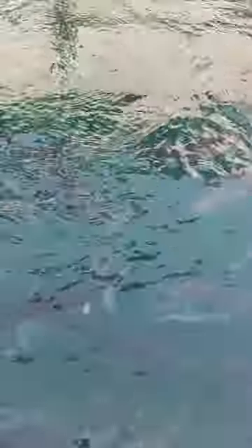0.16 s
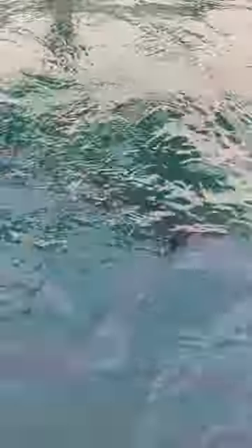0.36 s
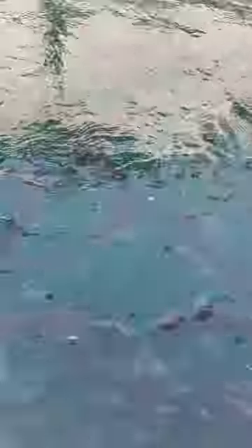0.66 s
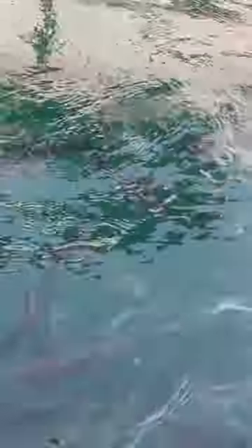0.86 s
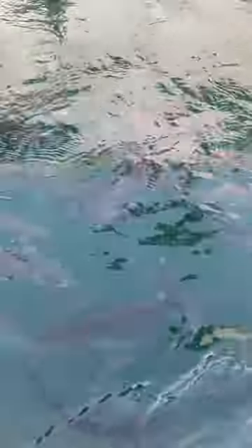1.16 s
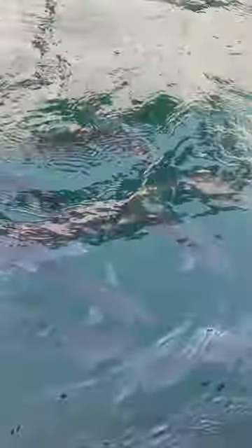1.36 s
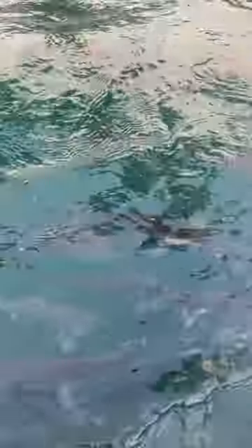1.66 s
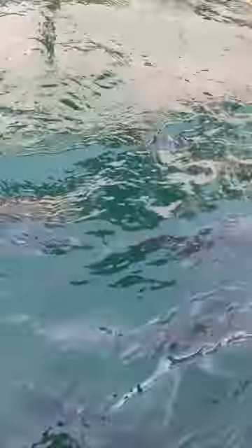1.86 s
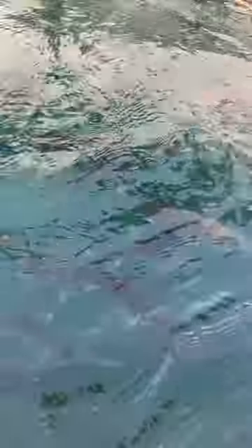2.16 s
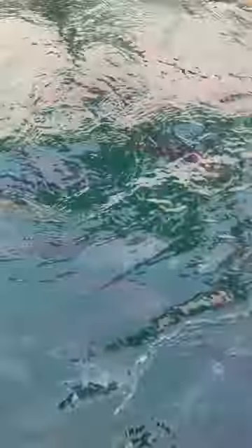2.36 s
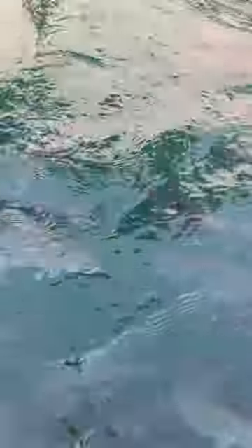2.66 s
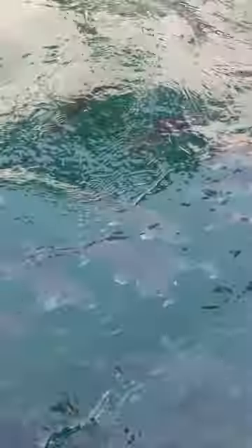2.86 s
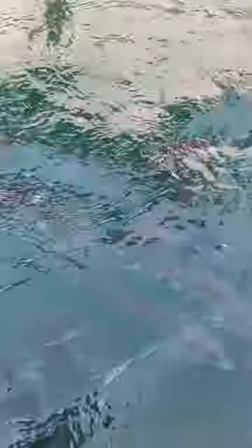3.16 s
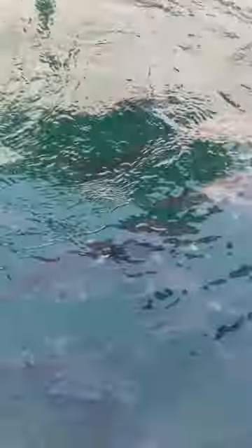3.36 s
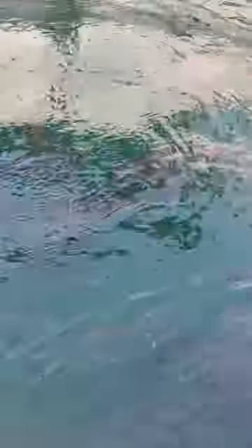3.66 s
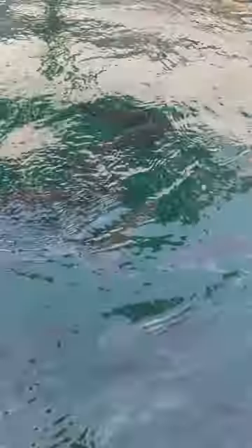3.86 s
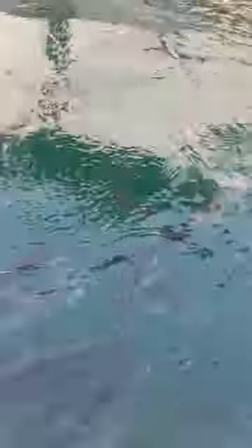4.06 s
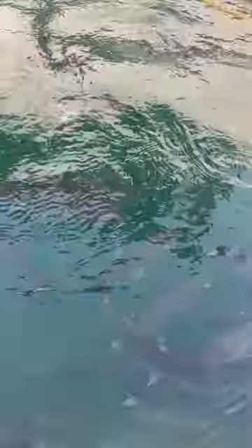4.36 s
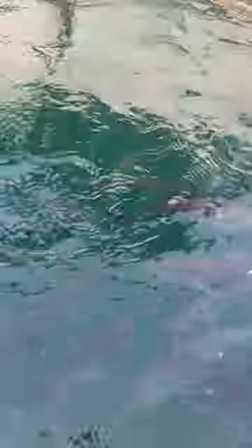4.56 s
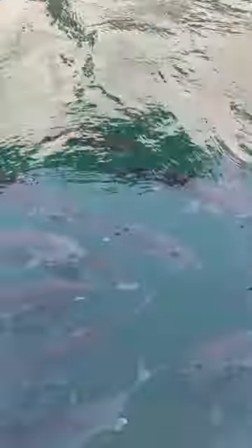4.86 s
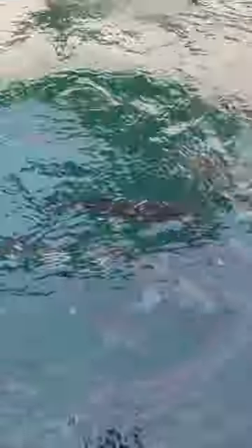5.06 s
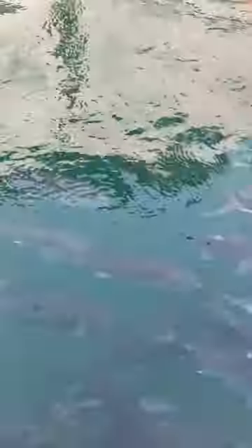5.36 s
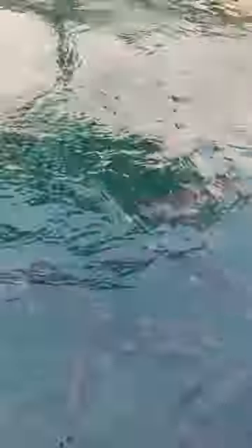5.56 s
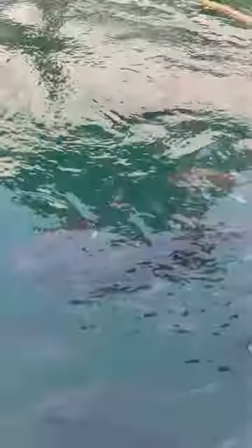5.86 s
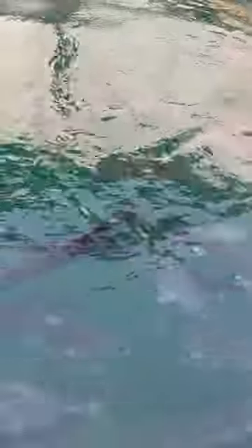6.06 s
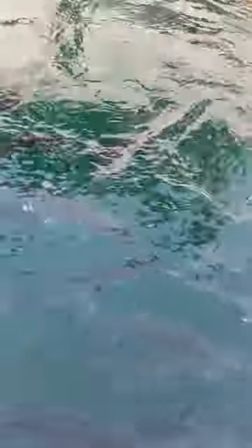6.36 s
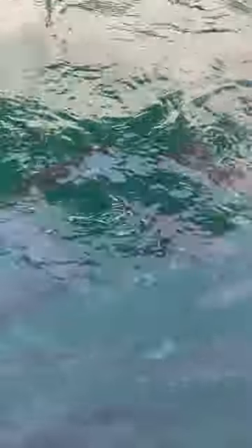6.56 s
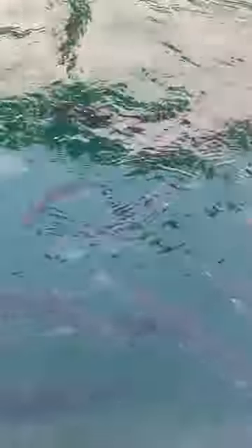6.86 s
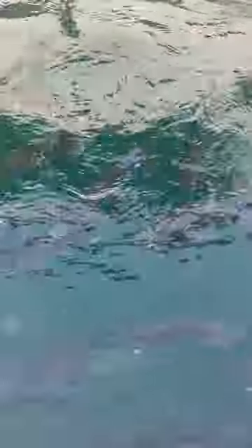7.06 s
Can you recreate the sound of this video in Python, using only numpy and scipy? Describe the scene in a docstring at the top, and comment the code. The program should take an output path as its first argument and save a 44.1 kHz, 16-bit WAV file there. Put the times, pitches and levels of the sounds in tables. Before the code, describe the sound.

Close stereo microphones just above the water at a floating fish pen. From 0 to 0.5 s a quick cluster of dull, low swell thumps rolls under small laps and bubbles; another comes around 0.8-1.2 s. A rising bubbly gulp plinks at 1.5 s, a sharp drip ticks at 2.0 s, and a deep thump with a low bloop lands near 2.2 s. Scattered thumps and plinks continue from 2.6 to 4.3 s, with a small crisp splash at about 3.95 s. Bright plinks and crackles cluster at 4.5 s, then a low bloop and gulps at 4.8 s. The swell quiets after 5 s; light splashes at 5.6 s, hollow bubbling at 6.2-6.7 s, and a crisp splash at 7.1 s. Throughout, faint foam, trickling bubbles, low rumble, soft wash, open air and a distant wavering machine hum with a thin whine, slightly stronger toward the end.

```python
"""Dull thumps of the swell over a low rumble come first, as small waves lap along a floating fish pen.
Thumps, plinking bubbles and upward gulps are gliding sine notes; ticks, splashes and spray are shaped noise.
Each lap stirs up a trickle of small bubbles and a soft foam of noise; crackles are runs of ringing ticks.
A distant machine hums and whines as a wavering sine with resonating noise, over a wash and open air.
Two closely spaced microphones, just above the water, pick it all up."""
import sys
import numpy as np
from scipy import signal
from scipy.fft import rfft, irfft, next_fast_len
from scipy.io import wavfile
from scipy.ndimage import uniform_filter1d

SR = 44100
rng = np.random.default_rng(int(sys.argv[2]) if len(sys.argv) > 2 else 0)


def pcm_store(signal):
    """Save signal as 16-bit PCM."""
    levels = np.round(np.clip(np.atleast_2d(signal), -1, 1) * 32767)
    wavfile.write(sys.argv[1], SR, levels.astype(np.int16).T)


N = 318402
TIME = np.arange(N) / SR
COARSE_TIME = TIME[::40]   # slow curves are worked out at every 40th sample
CUTOFF_HZ = 15900


def from_db(db):
    """Turn decibels into a gain."""
    return 10 ** (np.asarray(db) / 20)


def rms_one(x):
    """Scale a sound to an average (rms) strength of 1."""
    return x / np.sqrt(np.mean(x ** 2) + 1e-20)


def in_time(rows):
    """Read a (seconds, value) curve at every sample."""
    seconds, values = np.transpose(rows)
    return np.interp(TIME, seconds, values)


def at_hz(points, hz):
    """Read a (Hz, value) curve, with pitch counted in octaves."""
    f, value = np.transpose(points)
    return np.interp(np.log(np.maximum(hz, 1)), np.log(f), value)


def band(x, low_hz, high_hz):
    """Keep the sound between two pitches, with gentle edges."""
    sos = signal.butter(2, [low_hz, min(high_hz, .45 * SR)], "band", fs=SR, output="sos")
    return signal.sosfilt(sos, x)


def drift(rate_hz):
    """Slow random motion of spread 1: noise smoothed twice, so little is left above the rate."""
    r = np.exp(-2 * np.pi * rate_hz * 40 / SR)
    noise = rng.standard_normal(N // 40 + 2002)
    slow = signal.lfilter([1], [1, -2 * r, r * r], noise)[2000:]   # skip the settling of the filter
    return np.interp(np.arange(N) / 40, np.arange(len(slow)), rms_one(slow))


def fade_60db(t, t60_s):
    """Natural dying away that loses 60 dB in t60_s seconds."""
    return np.exp(-np.log(1000) * t / t60_s)


def bell(t, half_width_s):
    """A smooth rise and fall around time 0."""
    return np.exp(-.5 * (t / half_width_s) ** 2)


def glide_sine(pitch_hz, turn=0):
    """A sine that follows a moving pitch, starting some part of a turn into its cycle."""
    return np.sin(2 * np.pi * (np.cumsum(pitch_hz) / SR + turn))


def ring(x, hz, t60_s):
    """A resonance: each click in x sets a fading sine ringing."""
    r, w = from_db(-60 / (t60_s * SR)), 2 * np.pi * hz / SR
    return signal.lfilter([0, np.sin(w)], [1, -2 * r * np.cos(w), r * r], x)


def add(out, s, sound):
    """Mix a sound in, starting at time s in seconds."""
    i = int(round(s * SR))
    first, last = max(i, 0), min(i + len(sound), N)
    if last > first:
        out[first:last] += sound[first - i:last - i]


# How alike the left and right surroundings are. Each row: pitch in Hz, likeness from 0 to 1.
LIKENESS = [(180, 1), (300, .95), (500, .5), (800, .1), (1400, .6), (3000, .5), (5000, .85), (16000, .85)]


def surround(spectrum, patchy_db):
    """Stereo noise in half-octave bands, each flickering by itself; strength (rms) 1."""
    out, edges = 0, 20 * 2 ** np.arange(0, 10.1, .5)
    white = rng.standard_normal((2, 2, N))
    for k, (low, high) in enumerate(zip(edges, edges[1:])):
        hz = np.sqrt(low * high)
        if high < spectrum[0][0] or low > spectrum[-1][0]:
            continue
        mid, side = band(white[k % 2], low, high)   # neighbouring bands use separate noise
        alike = at_hz(LIKENESS, hz)
        gain = from_db(at_hz(spectrum, hz) + patchy_db * drift(15.2))
        # the side noise enters the right with its sign flipped
        pair = np.sqrt(1 + alike) * mid + np.sqrt(1 - alike) * side * [[1], [-1]]
        out = out + gain * pair
    return rms_one(out)


# Dull thumps of the swell. Each row: crest in seconds, level in dB, basic pitch in Hz,
# length of the dying away in cycles (stretched by each part's own width).
THUMPS = [(.02, -39, 165, .8), (.059, -30, 99.3, 0.42), (0.162, -32.5, 114.4, 0.6),
          (0.201, -27.5, 99.2, 0.32), (.222, -31, 111.4, 0.25), (.254, -31.5, 83.4, 0.44),
          (0.312, -29, 84.3, 0.37), (0.339, -36, 60.8, 0.3), (0.386, -36, 126.8, 1.0),
          (0.419, -37, 88, 0.79), (0.479, -44, 109, 0.46), (0.525, -39.5, 75, 0.29),
          (.805, -35.5, 78.4, 0.56), (0.869, -31, 63.6, 0.63), (.928, -31, 91.3, .4),
          (.976, -25.5, 66.2, 0.67), (1.046, -36, 74.7, .6), (1.195, -36.5, 108.7, .5),
          (1.218, -32, 89.9, 0.54), (1.631, -39.5, 87.8, 0.56), (2.149, -35.5, 124.8, 0.87),
          (2.18, -27.5, 115.8, 0.51), (2.211, -23, 63.7, 0.42), (2.57, -38, 72, 0.48),
          (2.749, -28, 81, 0.36), (2.837, -29.5, 87.8, 0.17), (3.028, -32.5, 92.5, 0.49),
          (3.117, -26, 112.7, 0.21), (3.129, -29, 63.2, 0.35), (3.352, -28, 72, 0.69),
          (3.694, -33, 77.6, 0.48), (3.809, -37, 57, 0.4), (3.98, -25.5, 115.8, 0.57),
          (4.27, -30, 96.8, 0.51), (4.771, -33, 133.6, 0.89), (4.827, -29.5, 100.2, 0.62),
          (6.162, -43, 66.5, 0.44), (6.218, -40.5, 68.8, 0.3), (6.271, -40, 80, .45),
          (6.429, -42, 58.4, 0.53), (6.572, -37.5, 60.6, 0.7)]
# A thump is a quick slap, the main push and a rebound. Each row: time after the crest in seconds,
# added level in dB, pitch as a ratio, half width in cycles (scaled by the rise or the dying away).
THUMP_PARTS = [(-.006, -7, 1.58, 0.76), (0, 0.5, 0.96, 1), (0.028, -19, 1.1, 0.34)]


def thumps(fall_octaves_per_s=24, rise=0.37):
    """Each part of a thump swells within a cycle or so and sinks in pitch as it dies."""
    out, t = np.zeros(N), np.arange(-2200, 4000) / SR
    for s, db, hz, tail in THUMPS:
        for after_s, part_db, ratio, cycles in THUMP_PARTS:
            pitch = hz * ratio * 2 ** np.clip(-fall_octaves_per_s * t, -.5, 1)
            width_cycles = cycles * np.where(t < 0, rise, tail)
            swell = 1 / np.cosh(t * hz * ratio / width_cycles)
            add(out, s + after_s + t[0], from_db(db + part_db) * swell * glide_sine(pitch, rng.random()))
    return out


# Colour of the rumble. Each row: pitch in Hz, relative strength in dB per Hz.
RUMBLE = [(20, -16.5), (33, -21.5), (52, 10.5), (90, 0), (140, -3), (200, -13.5), (280, -37), (400, -32.5)]
# Rumble between thumps. Each row: time in seconds, level in dB before gain_db is added.
RUMBLE_LEVEL = [(0.0, -41.5), (0.14, -53.5), (0.64, -57), (1.03, -54), (1.33, -60), (1.63, -56),
                (1.97, -59), (2.21, -55), (2.57, -57.5), (2.71, -57.5), (2.91, -53), (4.1, -57.5),
                (4.6, -60.5), (5.43, -60.5), (6.07, -58), (6.31, -54.5), (6.92, -56.5), (7.22, -58)]


def rumble(gain_db=5, churn_db=-13, attack_s=0.035, release_s=0.028):
    """Low noise that builds up to each thump and settles after it."""
    churn_power = 0
    for s, db, *_ in THUMPS:
        speed_s = np.where(COARSE_TIME < s, attack_s, release_s)
        build_up = np.exp(-np.abs(COARSE_TIME - s) / speed_s)
        churn_power = churn_power + (from_db(db + churn_db) * build_up) ** 2
    between = from_db(in_time(RUMBLE_LEVEL) + gain_db)
    level = np.sqrt(between ** 2 + np.interp(TIME, COARSE_TIME, churn_power))
    return level * surround(RUMBLE, patchy_db=3.0)


# Strength of the machine's hum. Each row: time in seconds, average (rms) level in dB before its waver.
HUM = [(0, -57), (.8, -66.5), (1.8, -60.5), (2.3, -61.5), (3.6, -62.5), (4.5, -60.5), (5.4, -57.5),
       (6.2, -56.5), (7.22, -53.5)]
# Resonances of the machine. Each row: pitch in Hz, width in Hz of each of two equal resonances in a row,
# rms level in dB before any swell with the hum.
MACHINE = [(163.3, 15.6, -65.5), (244.6, 19.4, -68), (314, 34, -81.5), (490, 56, -82), (1020, 66, -102),
           (1425, 20, -101.5), (2840, 30, -102), (3576, 120, -90), (3809, 91, -76)]


def machine(hum_hz=162.3, waver_db=3.0, wander_hz=0.95, low_follow=0.98, follow_top_hz=400):
    """A wavering sine hums; noise through narrow resonances rushes and whines, the low ones following it."""
    pitch = hum_hz + wander_hz * drift(1.58)
    hum_db = in_time(HUM)
    out = from_db(hum_db + waver_db * drift(7.2)) * np.sqrt(2) * glide_sine(pitch)
    for hz, width, db in MACHINE:
        t60 = np.log(1000) / (np.pi * width)
        swing_db = (hum_db - hum_db.mean()) * low_follow * (hz < follow_top_hz)
        noise = rng.standard_normal(N + SR)
        rush = ring(ring(noise, hz, t60), hz, t60)[SR:]   # skip a second while it builds up
        out = out + from_db(db + swing_db) * rms_one(rush)
    return out


# Colour of the open air. Each row: pitch in Hz, relative strength in dB per Hz.
AIR = [(150, -14.5), (300, -13), (520, -10), (750, -13.5), (1400, -6.5), (2500, -15), (3400, -16),
       (4400, -25.5), (6000, -10), (10000, -16), (16000, -8)]


def open_air():
    """Faint, broad noise surrounds the listener, its bands flickering."""
    return from_db(-73.0) * surround(AIR, patchy_db=3.0)


# The low wash swells with the waves and sinks between them. Each row: time in seconds,
# average (rms) level in dB before gain_db is added.
WASH = [(0, -72.5), (.27, -80), (.38, -70), (.72, -94), (.82, -68.5), (1.07, -77.5), (1.45, -63.5),
        (1.63, -82), (1.8, -71.5), (2.18, -74.5), (2.36, -79), (2.66, -77), (2.76, -62.5), (3.05, -66.5),
        (3.4, -73.5), (4.0, -65), (4.12, -83), (4.27, -63.5), (4.42, -92), (4.75, -61.5), (5.05, -72.5),
        (5.65, -65), (5.98, -79), (6.15, -64.5), (6.6, -61.5), (6.8, -71.5), (7.22, -62)]
# Colour of the wash. Each row: pitch in Hz, relative strength in dB per Hz.
WASH_SPECTRUM = [(260, -6), (400, -0.5), (520, 1), (750, -18), (1000, -12.5)]


def wash(gain_db=-1.5):
    """Water heaves against the floats: dull, uneven noise that follows the waves."""
    return from_db(in_time(WASH) + gain_db) * surround(WASH_SPECTRUM, patchy_db=5.5)


# Wavelets folding over, each stirring up bubbles around one size. Each row: crest in seconds,
# strength in dB of the stirring, centre pitch in Hz, half width in seconds of the rise.
LAPS = [(.08, -68, 616, 0.041), (.262, -62, 1140, 0.031), (.45, -67.5, 1890, 0.11),
        (.66, -65.5, 1270, 0.07), (0.952, -71.5, 1213, 0.034), (1.3, -69, 1200, 0.019),
        (1.34, -68, 687, 0.037), (1.522, -59, 1130, 0.017), (1.75, -69.5, 1510, 0.037),
        (1.931, -74, 1360, 0.27), (2.15, -64, 420, 0.044), (2.228, -65, 1320, 0.045),
        (2.737, -70, 1120, 0.033), (2.81, -67.5, 560, 0.041), (2.92, -81, 500, 0.086),
        (3.03, -76, 1660, 0.18), (3.22, -91, 3100, 0.071), (3.288, -71, 630, 0.067),
        (3.32, -74, 1720, 0.085), (3.69, -70, 1160, 0.063), (3.989, -59, 457, 0.0093),
        (4.541, -68, 1630, 0.092), (4.73, -67, 1960, 0.04), (4.76, -64, 520, 0.023),
        (5.14, -68, 615, 0.016), (5.205, -71.5, 1700, 0.034), (5.5, -66.5, 1530, 0.032),
        (5.64, -66, 447, 0.04), (5.662, -70.5, 1470, 0.043), (6.22, -79, 550, 0.059),
        (6.451, -73, 990, 0.013), (6.51, -69, 1120, 0.053), (6.367, -73, 1400, 0.0098),
        (6.595, -70, 1250, 0.038), (6.69, -71, 1090, 0.028), (7.16, -66.5, 860, 0.034)]


def stirring(t, hz, calm_db=-89, calm_tilt_db_per_octave=4.5, spread_octaves=0.8,
             lag_s_per_octave=0.0056, tail=0.68):
    """How strongly bubbles of one pitch sound: each lap swells and sinks, most near its centre pitch."""
    # a little stirring goes on between laps; calm_db is its level at 1 kHz
    power = from_db(calm_db + calm_tilt_db_per_octave * np.log2(hz / 1000)) ** 2
    for s, db, centre_hz, width in LAPS:
        octaves = np.log2(hz / centre_hz)
        late = t - s - lag_s_per_octave * octaves   # big bubbles sound first, small ones after
        swell = bell(late, width * np.where(late < 0, 1, tail))
        near_centre = np.exp(-.5 * (octaves / spread_octaves) ** 2)
        power = power + (from_db(db) * swell * near_centre) ** 2
    return np.sqrt(power)


def foam(gain_db=-14.5, grain_db=7.5, patchy_db=3):
    """Countless bubbles too faint to hear singly merge into grainy noise that swells with each lap."""
    out, edges = 0, 280 * 2 ** np.arange(0, 4.1, .5)
    for low, high in zip(edges, edges[1:]):
        hz = np.sqrt(low * high)
        flicker = from_db(gain_db + patchy_db * drift(40))
        level = np.interp(TIME, COARSE_TIME, stirring(COARSE_TIME, hz))
        out = out + flicker * level * rms_one(band(rng.standard_normal(N), low, high))
    return out * from_db(grain_db * drift(26))


def trickle(per_s=360, low_hz=449.7, octaves=3.1, gain_db=1, spread_db=4, rise=6, rise_spread=7):
    """Laps shed small bubbles at random, each with its own pitch and glide: rows like those of BUBBLES."""
    count = int(per_s * N / SR)
    s = rng.random(count) * N / SR
    hz = low_hz * 2 ** (octaves * rng.random(count))
    size, glide = np.clip(rng.standard_normal((2, count)), -1.8, 1.8)
    db = 20 * np.log10(stirring(s, hz)) + gain_db + spread_db * size
    t60 = 0.042 * (hz / 1000) ** -0.27   # high bubbles die away sooner
    return list(zip(s, db, hz, rise + rise_spread * glide, t60))


# Single air bubbles. Each row: start in seconds, level in dB before the fades, starting pitch in Hz,
# pitch rise in octaves per second, time to fade by 60 dB in seconds.
BUBBLES = [(.058, -50, 1800, 6, 0.025), (.06, -48.5, 670, -9, 0.057), (.216, -58, 1940, 13.5, .04),
           (.246, -65, 918.6, 4, 0.12), (.33, -64, 1351, 2, 0.14), (.418, -54, 1730, 6, 0.043),
           (.497, -52, 3190, 3, 0.024), (.565, -62, 880, -7, .08), (.612, -64, 1516, 6, 0.089),
           (.64, -56, 1430, -8.5, 0.068), (.659, -48.5, 1380, 12, 0.043), (.952, -53, 1110, -3, 0.041),
           (.954, -50, 1590, -4, 0.032), (1.183, -54, 2180, 9, 0.021), (1.284, -58, 740, 9.5, .11),
           (1.492, -40.5, 960, 30, 0.033), (1.522, -53, 555, 18, 0.058), (1.54, -51, 930, 13, 0.036),
           (1.724, -45, 996, 0, 0.025), (1.777, -55, 2010, 2, 0.024), (1.907, -47, 1323, 32.5, 0.037),
           (1.948, -49, 1400, 1, 0.027), (2.057, -48.5, 1350, -4, 0.029), (2.106, -55, 662.7, -7, 0.07),
           (2.14, -48, 626, -6, 0.027), (2.175, -32.5, 302, -16.5, .06), (2.189, -33, 225.2, -6, 0.066),
           (2.199, -51, 1730, 1, 0.031), (2.223, -48, 1440, 5, 0.032), (2.568, -45, 272, -21, .04),
           (2.733, -54, 952, 3, .04), (2.84, -53, 424, 5, 0.047), (2.841, -50, 1850, 1, .025),
           (2.893, -57, 605, 4, .05), (2.912, -48, 340, -8, 0.043), (2.931, -40, 1600, 15, 0.037),
           (2.961, -58, 1400, 6, 0.035), (3.0, -44.5, 334, -12, .06), (3.007, -51, 710, 7, 0.033),
           (3.066, -60, 1390, -3, 0.056), (3.105, -38, 240, -12, 0.029), (3.257, -43.5, 1730, 13, 0.032),
           (3.284, -53.5, 590, 11, 0.057), (3.298, -53.5, 338, -14, 0.035), (3.483, -49, 1816, -2, 0.022),
           (3.606, -49.5, 715, -2, 0.076), (3.671, -51, 1625, 0, 0.043), (3.692, -59, 3097, 5, .04),
           (3.737, -59.5, 3260, 1, .04), (3.738, -66, 1010, 3, 0.043), (3.812, -49.5, 1320, 8.5, 0.034),
           (3.842, -49, 1380, 7, .025), (3.958, -48, 1460, 25, 0.017), (3.97, -42, 223, -21, 0.032),
           (3.958, -38, 2600, 12, 0.017), (4.4772, -29, 1444, -5, .017), (4.501, -59, 1370, 4, .05),
           (4.5165, -32, 1420, -58, 0.011), (4.519, -43.5, 1096, -0.5, 0.038), (4.551, -50, 1950, 5, 0.032),
           (4.555, -50, 1320, 0, 0.035), (4.568, -57.5, 807, .5, 0.11), (4.648, -52, 640, 2, 0.023),
           (4.663, -56, 2230, -2, 0.028), (4.69, -57, 1770, 3, 0.024), (4.747, -50.5, 960, 8, 0.057),
           (4.763, -31, 253, -18.5, 0.061), (4.779, -48, 1030, 0.5, 0.084), (4.811, -46, 500, 5, .08),
           (4.816, -51.5, 1435, 8, 0.034), (4.922, -45, 485, 5.5, 0.083), (5.136, -57, 756, 1, 0.049),
           (5.212, -42, 2160, 26, 0.013), (5.213, -50, 1540, -10, 0.023), (5.254, -61, 660, -2, 0.052),
           (5.649, -39.5, 1390, -3, 0.019), (5.649, -50, 633, 1, 0.047), (5.68, -44, 1710, 27, .023),
           (6.185, -44, 535, -1, 0.045), (6.21, -48, 536, 0, 0.055), (6.225, -68, 1660, 3, 0.14),
           (6.236, -53, 536, -4, 0.091), (6.358, -49, 580, -13, .045), (6.359, -57, 820, -2, .035),
           (6.393, -47, 574, 16, 0.051), (6.438, -35, 512, 9, 0.033), (6.44, -53, 774, 9, 0.034),
           (6.477, -52, 1100, 12, 0.033), (6.479, -41, 574, 3, 0.07), (6.479, -53, 850, 6, 0.047),
           (6.481, -43.5, 272, 2, 0.077), (6.494, -57, 2050, 12, 0.023), (6.516, -59, 573, 5, 0.043),
           (6.581, -59, 1010, -3.5, .11), (6.581, -57, 577, 6, 0.05), (6.598, -61, 1700, 1, 0.038),
           (6.61, -52, 475, 3.5, 0.081), (6.655, -52, 464, 0, 0.054), (7.137, -50, 2360, -1.5, 0.067),
           (7.16, -52, 680, -2, 0.051)]


def bubbles(rows, attack_s, wobble_octaves):
    """A bubble rings once it pinches off; its pitch glides and wobbles with its shape and depth."""
    out, t = np.zeros(N), np.arange(5000) / SR
    shape = wobble_octaves * drift(58)
    for s, db, hz, rise, t60 in rows:
        age = t[t < t60]
        wobble = shape.take(int(s * SR) + np.arange(len(age)), mode="wrap")
        pitch = hz * 2 ** (np.clip(rise * age, -1, 1) + wobble)
        fade = fade_60db(age, t60) * (1 - np.exp(-age / attack_s))
        add(out, s, from_db(db) * fade * glide_sine(pitch))
    return out


# Small splashes. Each row: start in seconds, level in dB before gain_db and the fades, centre pitch in Hz,
# time to fade by 60 dB in seconds.
SPLASHES = [(.059, -58, 1390, 0.13), (0.661, -56.5, 2360, 0.096), (0.951, -58.5, 1680, 0.069),
            (2.057, -61, 2460, 0.051), (2.138, -56.5, 1500, 0.052), (2.142, -57, 3060, .03),
            (2.156, -57, 3000, 0.035), (2.238, -62.5, 1400, .05), (2.838, -52, 3300, 0.02),
            (3.136, -59, 2190, 0.076), (3.476, -58, 2760, 0.055), (3.843, -60.5, 2330, 0.043),
            (3.948, -69, 2380, 0.064), (3.956, -38.5, 2180, 0.029), (4.575, -53, 5050, 0.043),
            (5.124, -66, 3580, 0.0084), (5.581, -51.5, 3500, 0.016), (5.648, -59.5, 2740, 0.16),
            (5.827, -53, 3640, 0.018), (6.476, -76, 1250, .07), (6.529, -60, 4870, 0.15),
            (7.138, -44.5, 3400, 0.075)]


def splashes(gain_db=-1, grain_db=7.0, reach=1.6, attack_s=0.00029):
    """A crest breaks in a quick burst of grainy noise around one pitch."""
    out, t = np.zeros(N), np.arange(7000) / SR
    for s, db, hz, t60 in SPLASHES:
        uneven = from_db(grain_db * np.clip(rng.standard_normal(len(t)), -2, 2))
        grains = rng.standard_normal(len(t)) * uneven
        burst = band(band(grains, hz / reach, hz * reach), hz / reach, hz * reach)
        fade = fade_60db(t, t60) * (1 - np.exp(-t / attack_s))
        add(out, s, from_db(db + gain_db) * fade * rms_one(burst))
    return out


# Soft showers of spray. Each row: loudest moment in seconds, rms level in dB there before the flicker,
# centre pitch in Hz, half width in seconds.
SPRAYS = [(0.116, -66, 5100, 0.017), (0.419, -88, 3035, 0.55), (1.273, -59.5, 4960, 0.0032),
          (3.0, -78, 2220, 0.066), (3.171, -77.5, 2870, .035), (3.235, -75.5, 3480, .035),
          (3.341, -83, 3400, 0.036), (4.296, -68.5, 2580, 0.061), (4.299, -89, 3540, 0.037),
          (4.29, -70.5, 4400, 0.058), (4.72, -79, 2540, 0.024), (5.663, -73, 6030, 0.019),
          (6.538, -72, 2950, 0.012), (6.542, -79.5, 6500, 0.14), (6.607, -66, 3430, 0.012),
          (6.601, -76, 2060, 0.03), (6.909, -70.5, 1960, 0.0071)]


def sprays(reach=1.18, grain_db=3):
    """Fine spray settles as a narrow band of hiss that swells and sinks, flickering."""
    out, t = np.zeros(N), np.arange(-SR // 4, SR // 4) / SR
    for s, db, hz, width in SPRAYS:
        hiss = rms_one(band(rng.standard_normal(len(t)), hz / reach, hz * reach))
        add(out, s + t[0], from_db(db) * bell(t, width) * hiss)
    return out * from_db(grain_db * drift(27))


# The nearest droplets falling back. Each row: time of the tick in seconds, peak level in dB
# before gain_db is added, brightest pitch in Hz.
DROPS = [(0.712, -55, 10500), (1.3803, -51, 10500), (1.482, -52, 12700), (1.5286, -53, 8430),
         (1.694, -52.5, 10150), (1.8605, -54, 15600), (2.038, -37, 11600), (2.257, -47, 10200),
         (2.434, -49.5, 10530), (2.8252, -53, 11350), (3.4508, -48.5, 12500), (3.598, -52.5, 6800),
         (3.7293, -56.5, 10930), (3.843, -50, 8100), (3.959, -49, 5800), (4.1522, -49.5, 10700),
         (4.4214, -50.5, 12000), (4.5283, -46.5, 9800), (4.573, -54, 6350), (4.7004, -48, 11700),
         (4.797, -57, 12900), (5.011, -60, 8350), (5.1244, -47.5, 8400), (5.5818, -44.5, 5160),
         (5.639, -52, 6200), (5.996, -51.5, 6100), (6.107, -49.5, 10000), (6.2543, -48, 10300),
         (6.4986, -49, 6000), (6.652, -58, 13000), (7.064, -53, 8150), (7.14, -42, 12200)]


def drops(gain_db=3, crack_s=0.00051, lead_s=0.00038, spray_s=0.021, spray_db=-23, low_hz=5000,
          slope_db_per_octave=15, strays_per_s=8, stray_db=-58.5, stray_spread_db=3.5):
    """A droplet hits with a sharp tick of noise and a trace of spray, each with its own colour."""
    out, t = np.zeros(N), np.arange(-300, 2500) / SR
    distance_s = np.abs(t)
    crack = np.exp(-distance_s / crack_s) + from_db(spray_db) * np.exp(-t / spray_s)
    shape = np.where(t < 0, np.exp(-distance_s / lead_s), crack)
    edges = np.geomspace(low_hz, 16000, 4)
    # farther droplets fall at random
    stray_s = TIME[rng.random(N) < strays_per_s / SR]
    stray_level_db = stray_db + stray_spread_db * rng.standard_normal(len(stray_s))
    stray_hz = rng.uniform(1.13 * low_hz, CUTOFF_HZ, len(stray_s))
    for s, db, hz in [*DROPS, *zip(stray_s, stray_level_db, stray_hz)]:
        tick = 0
        for low, high in zip(edges, edges[1:]):
            # the tick falls off to both sides of its brightest pitch
            octaves_off = abs(np.log2(np.sqrt(low * high) / hz))
            grain = rng.standard_normal(len(t))
            tick = tick + from_db(-slope_db_per_octave * octaves_off) * band(grain * shape, low, high)
        add(out, s + t[0], from_db(db + gain_db) * tick / np.abs(tick).max())
    return out


# Crackles, tight clusters of droplets bursting. Each row: start in seconds, level in dB of the
# strongest possible tick, centre pitch in Hz, length in seconds.
CRACKLES = [(0.669, -57, 2480, .02), (2.819, -51, 6450, .025), (3.459, -49.5, 5570, .035),
            (3.601, -55, 2430, .025), (4.531, -47, 7400, .022), (4.581, -48, 6800, .02),
            (5.641, -48, 5700, .03), (6.497, -55, 5960, .006), (6.9, -50, 2900, .018),
            (7.1348, -45.5, 3500, .006), (7.143, -56, 3030, .025)]


def crackles(ticks_per_s=830, range_db=10, spread_octaves=1.57, cycles=14):
    """A thin sheet of water tears into an uneven run of sharp ticks, each ringing a few cycles."""
    out, t = np.zeros(N), np.arange(600) / SR
    for s, db, hz, length in CRACKLES:
        for k in range(int(np.ceil(length * ticks_per_s))):
            late, weak, octave = rng.random(3)
            pitch = hz * 2 ** (spread_octaves * (octave - .5))
            tick = fade_60db(t, cycles / pitch) * np.sin(2 * np.pi * pitch * t)
            add(out, s + (k + late) / ticks_per_s, from_db(db - range_db * weak) * tick)
    return out


# Gulps, air pockets that close up and glide upwards. Each row: loudest moment in seconds,
# peak level in dB, pitch in Hz there, rise in octaves per second, half width in seconds of the swell.
GULPS = [(1.511, -49.5, 1620, 68, 0.0041), (4.491, -54, 1524, 24, 0.008), (4.499, -61, 2220, 30, 0.0045),
         (4.839, -45.5, 571, 33, 0.0037), (4.857, -50, 959, 47, 0.0057), (6.415, -61, 845, 20.6, 0.0098),
         (6.43, -58, 1224, 32, 0.0058), (6.445, -65, 1660, 14.6, 0.0075)]


def gulps(tail=0.9):
    """An air pocket shrinks under a wave: its note sweeps up and stops as the pocket closes."""
    out, t = np.zeros(N), np.arange(-1800, 1800) / SR
    for s, db, hz, rise, width in GULPS:
        pitch = hz * 2 ** (rise * t)
        swell = bell(t, width * np.where(t < 0, 1, tail))
        add(out, s + t[0], from_db(db) * swell * glide_sine(pitch))
    return out


def scatter(x, t60_s=0.14, delay_s=0.0015, low_hz=260, high_hz=5000):
    """Float and walkway throw back a short, dull spray of echoes (fading noise), different on each side."""
    t = np.arange(SR // 3) / SR
    fade = fade_60db(t, t60_s) * (1 - np.exp(-t / delay_s))
    echoes = rng.standard_normal((2, len(t))) * fade
    echoes = echoes / np.sqrt(np.sum(echoes ** 2, axis=1, keepdims=True))
    return signal.fftconvolve(x[None], band(echoes, low_hz, high_hz), axes=1)[:, :N]


def scene(near_echo_db=-5, far_echo_db=-2, low_hz=32):
    """Plinks and splashes close by, lapping farther along the pen, over rumble, machine and open air."""
    swell = band(thumps(), low_hz, 3400) + band(rumble(), low_hz, 345)
    far = bubbles(trickle(), attack_s=0.0013, wobble_octaves=0.015) + foam()
    near = bubbles(BUBBLES, attack_s=0.0025, wobble_octaves=0.04)
    near = near + splashes() + sprays() + drops() + crackles() + gulps()
    echoes = scatter(from_db(near_echo_db) * near + from_db(far_echo_db) * far)
    return swell + machine() + open_air() + wash() + near + far + echoes


# Colour of the microphones, plus a dip in the treble near 4.7 kHz. Each row: pitch in Hz, gain in dB.
MIC = [(20, 2), (4000, -1.5), (4700, -5.5), (6000, -5), (7700, -6), (8200, 0), (10000, 1.5), (13300, -1.5),
       (14300, -13.5), (16000, -9)]
# How far the right microphone trails the left. Each row: pitch in Hz, phase in radians.
TRAIL = [(0, 0), (450, 0), (1700, 1), (3500, 1.2), (4300, 2.8), (4900, 3.3), (6400, 6.2), (7500, 6.4),
         (8800, 9.4), (11000, 12.6), (13200, 15.7), (14600, 18.8), (16000, 19)]


def record(dry):
    """The microphones colour the sound, the right one trails the left, and the top is cut."""
    size = next_fast_len(N + SR // 10)
    hz = np.arange(size // 2 + 1) * SR / size
    left, right = rfft(dry, size) * from_db(at_hz(MIC, hz))
    trail = np.interp(hz, *np.transpose(TRAIL))
    pair = irfft(np.array([left, right * np.exp(-1j * trail)]), size)[:, :N]
    top_cut = signal.ellip(10, .3, 70, CUTOFF_HZ, fs=SR, output="sos")
    return signal.sosfilt(top_cut, pair)


dry = scene()
out = record(dry)
pcm_store(out)
```